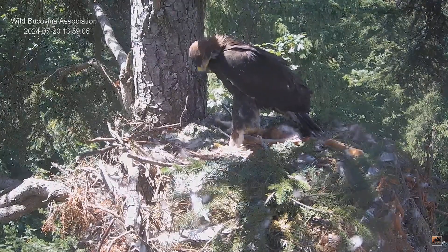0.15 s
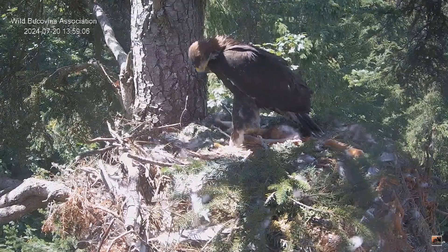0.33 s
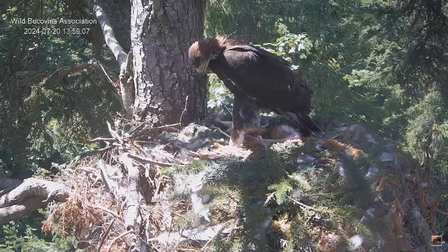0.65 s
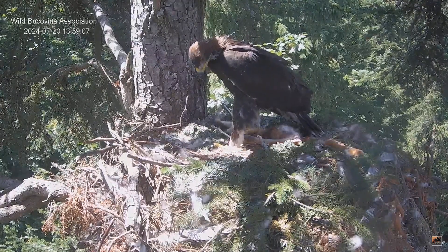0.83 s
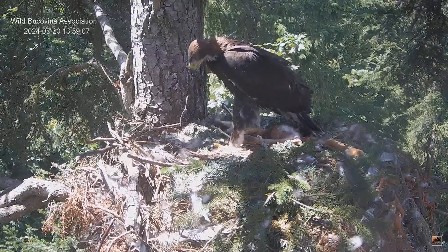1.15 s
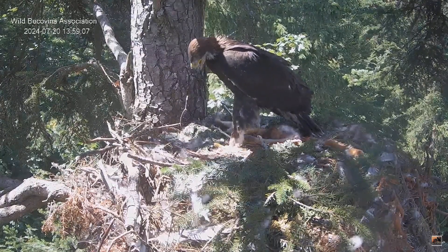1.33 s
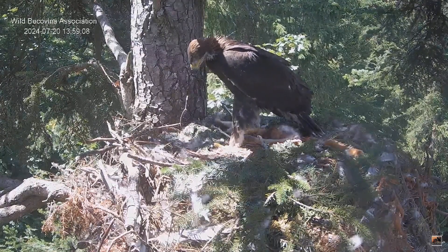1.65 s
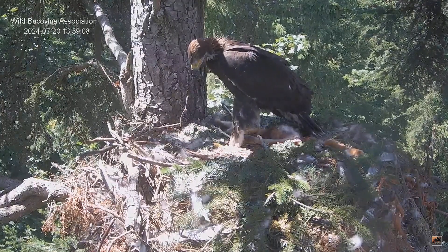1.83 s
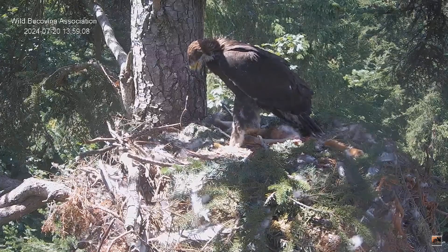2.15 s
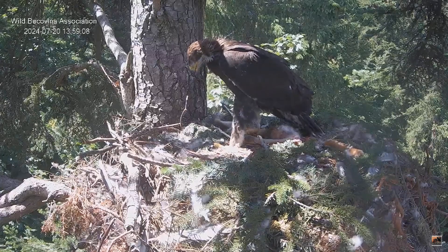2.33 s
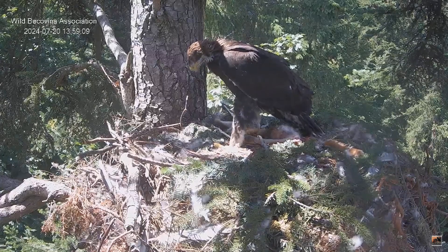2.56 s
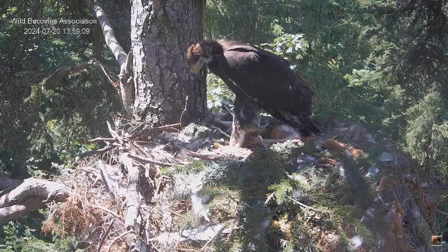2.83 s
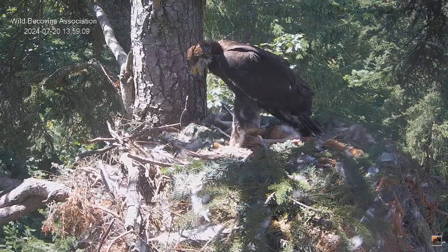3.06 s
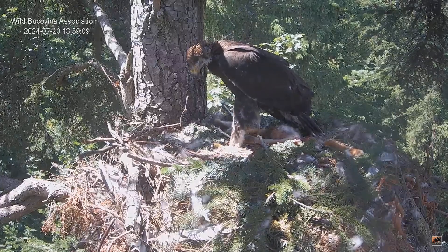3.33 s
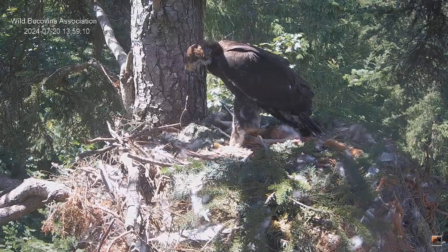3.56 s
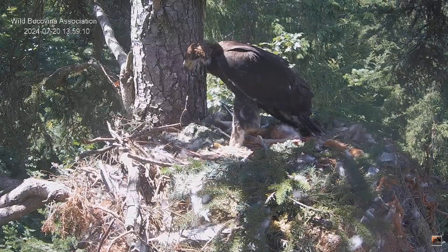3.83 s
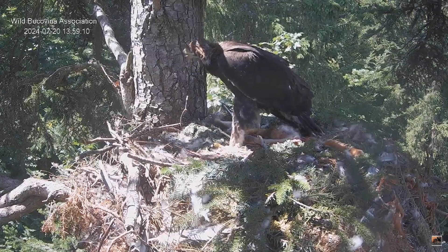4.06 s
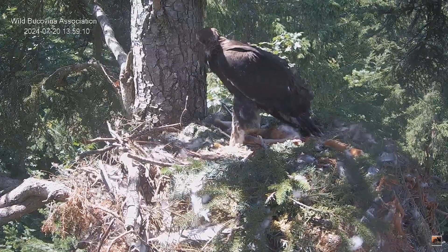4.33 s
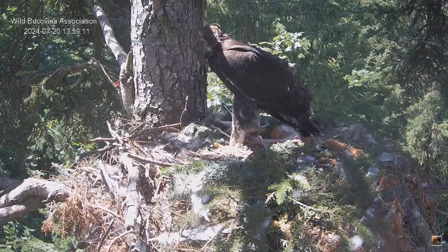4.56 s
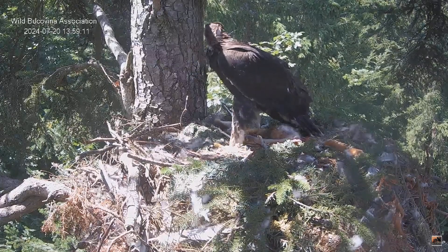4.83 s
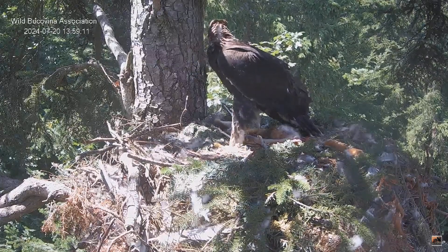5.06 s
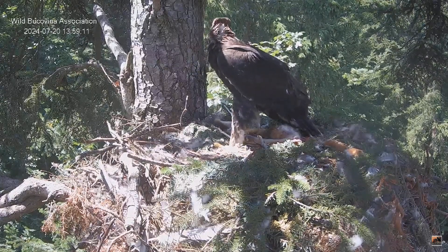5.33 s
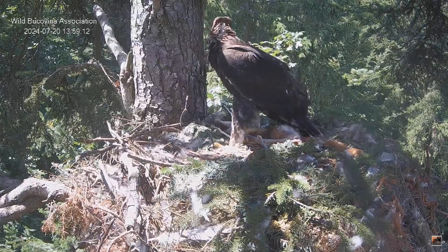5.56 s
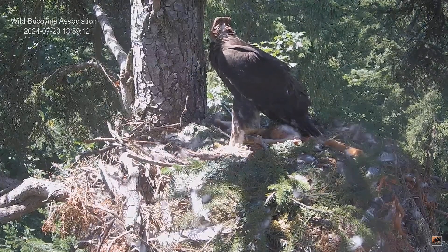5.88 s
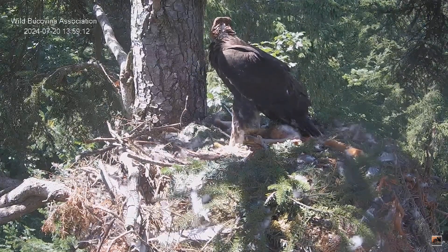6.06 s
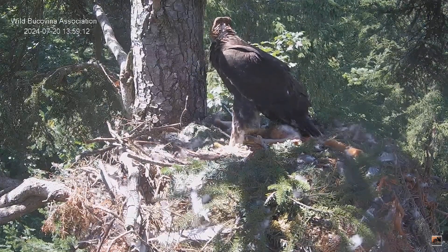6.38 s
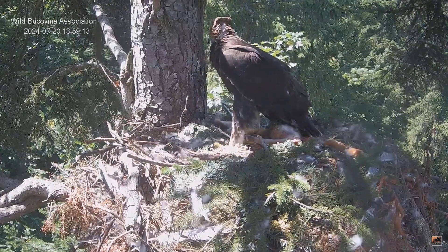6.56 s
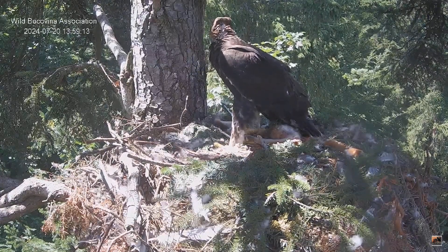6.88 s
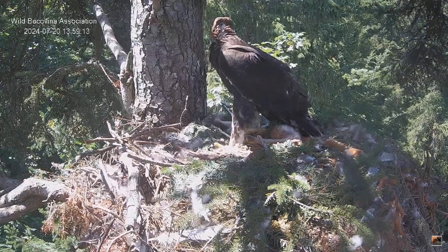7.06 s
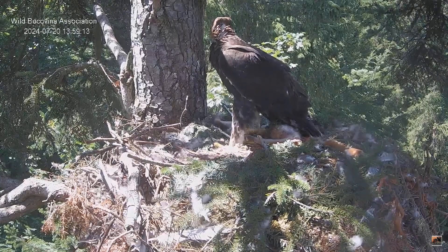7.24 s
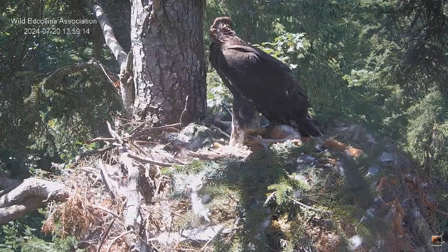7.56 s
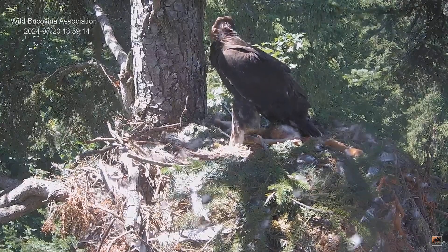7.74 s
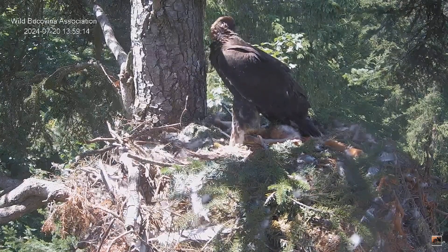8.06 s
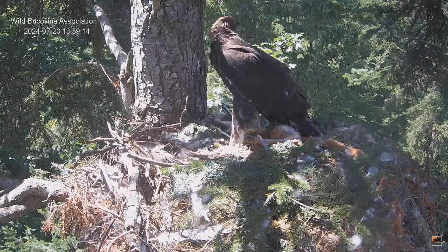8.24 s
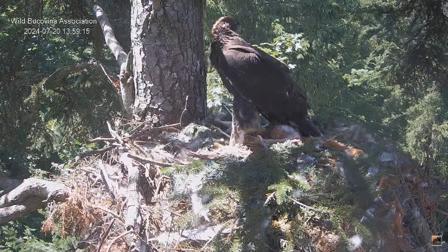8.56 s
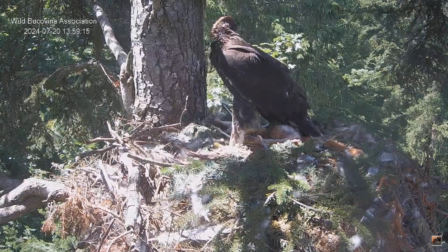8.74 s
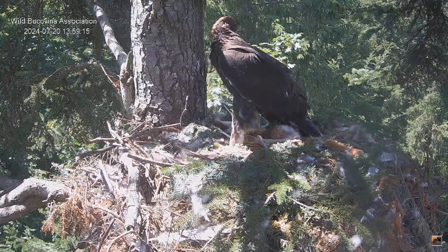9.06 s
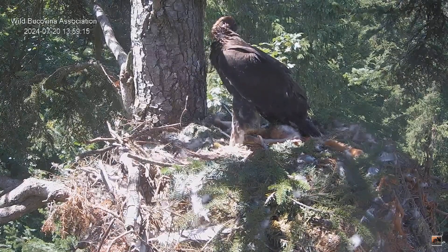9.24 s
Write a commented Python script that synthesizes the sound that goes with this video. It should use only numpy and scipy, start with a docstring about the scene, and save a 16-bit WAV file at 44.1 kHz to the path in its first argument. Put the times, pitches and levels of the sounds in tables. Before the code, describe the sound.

A young eagle begs close to the microphone in a conifer forest. The tail of a yelp is heard at the very start. Twelve calls follow, at about 0.4, 1.2, 2.1, 2.9, 3.8, 4.5, 5.2, 5.9, 6.7, 7.4, 8.1 and 8.8 seconds. Each opens with a tiny beak tick, shoots up into a piercing, very high whistle held for about a quarter second, then cracks into a short, softer yelp that falls in two steps. The yelps are raspy until about 3.5 seconds, then become cleaner and a little lower. A few later whistles grate slightly. From 4 seconds the echo among the trunks grows, staying fuller from about 6.5 seconds on. A very faint, steady forest hush lies underneath, and light puffs of wind rumble on the microphone, mostly in the second half, most noticeably near 8 and 9 seconds.

```python
"""A young eagle begging from its nest in a conifer forest, close to a fixed microphone.
The beak clicks open, the tightening syrinx sends up a piercing whistle that holds, and the voice
cracks into a yelp that falls in two register steps. Nest sticks within a metre or two smear the yelps.
Farther off, trunks echo the calls, more strongly once the bird lifts its head.
Light wind rumbles on the microphone over a faint forest hush."""
import sys
import numpy as np
from scipy import signal
from scipy.fft import rfft, irfft, next_fast_len
from scipy.io import wavfile
from scipy.ndimage import uniform_filter1d, minimum_filter1d, map_coordinates

SR = 44100
rng = np.random.default_rng(int(sys.argv[2]) if len(sys.argv) > 2 else 0)


def master(y):
    """Save y as 16-bit WAV."""
    cut = np.clip(np.atleast_2d(y).T, -1, 1)
    pcm = np.round(cut * 32767)  # scale
    wavfile.write(sys.argv[1], SR, pcm.astype(np.int16))


N = 414981
TIME = np.arange(N) / SR
TOP_HZ = 14700

# Whistles, levels relative: start_s, crack_s, held_hz, final_hz, rise_s, octave_db, hoarse_db,
# level_db, swell_db, snap_db, low_null_hz, low_depth_db, high_null_hz, high_depth_db
WHISTLE_CALLS = [(0.383, 0.604, 4548, 4800, 0.024, -27.5, -42.5, -8.5, 7.5, -14.5, 4623, 7.5, 4675, 12),
                 (1.249, 1.473, 4529, 4877, 0.029, -28.5, -41.5, -8, -2, -11, 4523, 8.5, 4700, 3.5),
                 (2.098, 2.316, 4628, 4810, 0.027, -28.5, -43, -8, 0.5, -7.5, 3980, 3, 4725, 10),
                 (2.891, 3.109, 4582, 4823, 0.023, -26, -35.5, -6.5, 2, -12, 4385, 13, 4580, 6.5),
                 (3.76, 3.983, 4680, 4861, 0.035, -28, -36.5, -5, -4.5, -11.5, 4370, 14.5, 4720, 4.5),
                 (4.519, 4.735, 4592, 4822, 0.021, -24.5, -42, -9, 13, -7.5, 4080, 17.5, 4734, 18),
                 (5.183, 5.408, 4647, 4858, 0.028, -28, -46.5, -9.5, 5, -9.5, 4593, 16.5, 4874, 7),
                 (5.887, 6.113, 4642, 4987, 0.024, -28.5, -47.5, -10, -0.5, -7, 4657, 23.5, 4961, 14),
                 (6.685, 6.905, 4490, 4998, 0.026, -28, -47.5, -7, 13.5, -16, 4684, 17.5, 4927, 18.5),
                 (7.373, 7.587, 4732, 4962, 0.025, -31.5, -41.5, -8.5, -1, -6.5, 4670, 11.5, 4872, 15),
                 (8.061, 8.288, 4663, 4935, 0.02, -35, -43.5, -6, 5, -10.5, 4753, 9.5, 4864, 11),
                 (8.795, 9.013, 4576, 5024, 0.017, -35, -49, -9, -8.5, -10.5, 4775, 24, 4840, 3.5)]
# Yelps, one ahead of the first whistle, then one after each; levels relative: upper_start_s,
# lower_start_s, end_s, upper_hz, lower_hz, slide_foot_db, upper_db, lower_db, tilt_db_per_octave
YELP_CALLS = [(-0.045, -0.013, 0.062, 2450, 1618, -13, -13, -16, 2.5),
              (0.639, 0.658, 0.745, 2431, 1675, -15.5, -12.5, -11, 1),
              (1.518, 1.527, 1.624, 2391, 1669, -8.5, -12.5, -11.5, 2.5),
              (2.365, 2.379, 2.468, 2442, 1689, -9, -13.5, -12, 1.5),
              (3.156, 3.168, 3.262, 2440, 1722, -10, -11, -12.5, 0),
              (4.028, 4.072, 4.143, 2292, 1517, -6, -11, -12, -1.5),
              (4.783, 4.827, 4.88, 2222, 1469, -13.5, -12, -13.5, -1.5),
              (5.461, 5.51, 5.56, 2110, 1412, -7.5, -11, -15.5, -13),
              (6.17, 6.204, 6.262, 2087, 1427, -7.5, -8.5, -14.5, -17),
              (6.965, 7.013, 7.064, 2100, 1378, -6, -8, -14.5, -17),
              (7.649, 7.683, 7.738, 2138, 1450, -3, -13.5, -11, -11),
              (8.335, 8.376, 8.435, 2152, 1431, -13, -10.5, -16.5, -12),
              (9.064, 9.109, 9.163, 2178, 1435, -16.5, -9.5, -15, -11.5)]
# Throat resonance that the whistle climbs into: pitch_hz, gain_db
THROAT_RESONANCE = [(2800, -32.5), (3500, -15), (3950, -14.5), (4350, -3.5), (4600, 1.5)]
# Side tones of a hoarse whistle: pitch_ratio, relative_db
HOARSE_TONES = [(0.748, -16), (.89, -19), (1.282, -11), (1.501, -8), (1.709, -12.5), (2.452, -26.5)]
# Moments when the whistle grates: start_s, end_s, level_db
GRATE_SPELLS = [(6.065, 6.112, -30), (7.47, 7.585, -28), (8.92, 9.01, -34)]
# Throat colour of the yelp's harmonics: frequency_hz, gain_db
THROAT_COLOUR = [(700, -32), (1150, -4), (1500, -7), (2200, -2), (2900, -0.5), (3600, -6.5), (4400, -5),
                 (5400, -7), (6500, -8), (8200, -11), (10000, -22.5), (14000, -38)]
# Vocal strain, harsh at first, later nearly clean: time_s, roughness (0-1)
VOICE_STRAIN = [(0, .32), (3.3, .42), (4, .13), (5.4, .08), (9.41, .09)]
# Air noise in the voice: frequency_hz, relative_db
BREATH_SPECTRUM = [(300, -57), (800, -27.5), (1800, -12.5), (3600, -5), (5500, 2), (7800, 2.5), (10000, -8),
                   (14500, -22)]
# Beak openings: start_s, relative_db
BEAK_OPENINGS = [(0.37, -34), (1.232, -35), (2.083, -32.5), (2.875, -37.5), (3.744, -41.5), (4.498, -53.5),
                 (5.172, -28.5), (5.869, -36.5), (6.673, -28), (7.359, -36.5), (8.044, -34), (8.775, -34)]
# Colour of a beak tick: frequency_hz, relative_db
TICK_SPECTRUM = [(200, -26), (600, -18.5), (950, -5.5), (1300, -8.5), (2100, -9), (3000, -24), (5000, -44),
                 (14000, -71)]
# Decay of the echoes among the trunks: frequency_hz, t60_s
TRUNK_DECAY = [(1000, 0.067), (2200, 0.8), (5000, 0.64), (7000, 1), (10000, 0.39)]
# Needles swallow the treble of the echoes: frequency_hz, gain_db
NEEDLE_FILTER = [(4800, 2.5), (8000, -1), (10000, -4.5)]
# Puffs of wind at the microphone: start_s, end_s, relative_db
WIND_GUSTS = [(0.167, 0.768, -69.5), (1.121, 1.425, -70.5), (2.394, 2.537, -51), (2.783, 3.26, -54),
              (3.956, 4.42, -46), (4.628, 4.724, -38.5), (5.19, 5.28, -51.5), (6.022, 6.313, -45.5),
              (6.784, 7.3, -44), (7.535, 7.653, -40), (7.828, 7.974, -30.5), (8.155, 8.284, -56.5),
              (8.932, 9.41, -36.5)]
# Wind rumble on the microphone: frequency_hz, relative_db
RUMBLE_SPECTRUM = [(20, 4.5), (45, 1.5), (100, -7), (170, -16), (250, -23), (400, -32), (700, -54),
                   (1500, -100)]
# Hush of the surrounding forest: frequency_hz, relative_db
HUSH_SPECTRUM = [(30, -6), (300, -0.5), (600, -4), (1500, -11), (5000, -15), (10000, -17.5), (15000, -21.5)]


def whistles(onset_hz=2800, gain_db=-1.25, snap_drop=.07, third_db=-12):
    """The syrinx tightens: a nearly pure tone shoots up, wavers higher and ends in a snap."""
    out, air = np.zeros(N), noise(BREATH_SPECTRUM)
    for call, (*_, tilt_db) in zip(WHISTLE_CALLS, YELP_CALLS[1:]):
        start, end, held_hz, final_hz, rise_s = call[:5]
        octave_db, hoarse_db, level_db, swell_db, snap_db, *nulls = call[5:]
        span = during(start, end + .008)
        t = TIME[span]
        age = np.abs(t - start)
        progress = age / (end - start)
        slack = np.exp(-(age / rise_s) ** 1.3)  # 1 at the onset, 0 once taut
        hz = held_hz + (final_hz - held_hz) * progress - (held_hz - onset_hz) * slack
        held_db = level_db + swell_db * (progress - .5) + along(THROAT_RESONANCE, hz)
        held_db += (1 + 4 * slack) * ripple(hz, 110) - trunk_dips(hz, nulls)
        snap = ramp((t - end + .001) / .002)
        hz = hz * (1 - snap_drop * ramp((t - end + .0014) / .011))
        waver = .0016 * wobble(1200, t) + (.0012 + .01 * slack) * wobble(110, t) + .0026 * wobble(24, t)
        phase = cycle(hz * (1 + waver))
        flutter_db = 2 * wobble(60, t) + (.4 + 2 * slack) * wobble(360, t)
        level = amp(gain_db + held_db + snap * (snap_db - held_db) + flutter_db)
        overtones = overtone(2, t, hz, phase) + amp(third_db + .6 * tilt_db) * overtone(3, t, hz, phase)
        tone = level * np.sin(phase) + amp(octave_db + 1 - 20 * slack) * overtones + grating(t, hz)
        hoarse = hoarseness(t, hz, tilt_db, air[span])
        hoarse *= amp(hoarse_db + 2 + 2 * wobble(35, t)) * (1 - slack) ** 12
        gate = ramp(age / .015) * ramp((end + .0065 - t) / .001)
        out[span] = gate * (np.sqrt(2) * tone + hoarse)
    return out


def overtone(k, t, hz, phase, notch_db=9, spacing_hz=130):
    """Harmonic k of the whistle flickers and drops out as it glides through narrow notches."""
    db = notch_db * np.minimum(ripple(k * hz, spacing_hz), 0) + 2.2 * wobble(160, t)
    return amp(db) * np.sin(k * phase)


def hoarseness(t, hz, tilt_db, air, hiss_db=-12):
    """Breath hiss and unsteady side tones around the whistle."""
    out = amp(hiss_db) * air
    for ratio, db in HOARSE_TONES:
        head_db = .5 * tilt_db * np.log2(ratio / 1.5)  # a turned head favours the low side tones
        phase = cycle(hz * (ratio + .03 * wobble(28, t)))
        side_tone = wobble(300, t) * np.sin(phase) + wobble(300, t) * np.cos(phase)
        out += amp(db + head_db + 4.5 * wobble(40, t)) * side_tone
    return out


def grating(t, hz, pitch_ratio=.87):
    """A shaky second vibration under the whistle, only where the voice grates."""
    level = sum(amp(db) * ramp((t - start) / .01) * ramp((end - t) / .01)
                for start, end, db in GRATE_SPELLS)
    return level * (1 + .6 * wobble(300, t)) * np.sin(cycle(hz * (pitch_ratio + .055 * wobble(350, t))))


def yelps(crack_hz=4500, catch_hz=2480, crack_db=-22, choke_db=-22, stutter_db=4,
          upper_fall=.07, lower_fall=.23, sag_db=-4, fade_db=-21, dull_db=-9):
    """The whistle breaks into a thin slide; the voice catches, drops about a fifth and dies away."""
    out, air = np.zeros(N), noise(BREATH_SPECTRUM)
    cracks = [YELP_CALLS[0][0] - .04] + [call[1] for call in WHISTLE_CALLS]
    for crack, call in zip(cracks, YELP_CALLS):
        start, step, end, upper_hz, lower_hz, foot_db, upper_db, lower_db, tilt_db = call
        span = during(crack, end + .006)
        t = TIME[span]
        rough = np.interp(start, *np.transpose(VOICE_STRAIN))
        stages = [(crack, start), (start, step), (step, end)]
        slide, early, late = (np.clip((t - a) / (b - a), 0, 1) for a, b in stages)
        caught = ramp((slide - .66) / .35)
        settled = ramp((t - start + .00051) / .0014)
        drop = ramp((t - step + .004) / .007)
        # the sliding voice stutters; under strain it almost chokes off
        unsteady = .05 * (1 - caught) * wobble(260, t)
        slide_hz = (crack_hz + (catch_hz - crack_hz) * slide ** 1.2) * (1 + unsteady)
        broken_db = crack_db + choke_db * rough + stutter_db * wobble(260, t)
        slide_db = caught * foot_db + (1 - caught) * broken_db
        # it settles in the upper register
        hz = slide_hz + settled * (upper_hz * (1 - upper_fall * (early - .5)) - slide_hz)
        db = slide_db + settled * (upper_db + sag_db * (early - .5) - slide_db)
        upper_rough = .24 * (1 - caught) + .75 * caught * rough
        upper = amp(db) * voice(t, hz, tilt_db - 6 * (1 - settled), 0, upper_rough, air[span])
        # the lower register sinks and loses its overtones as the pressure goes
        hz = lower_hz * (1 - lower_fall * late ** 1.25)
        db = lower_db + fade_db * late ** 1.9
        lower = amp(db) * voice(t, hz, tilt_db, dull_db * late ** 4, rough, air[span])
        gate = ramp((t - crack) / .008) * ramp((end + .005 - t) / .012)
        out[span] = gate * ((1 - drop) * upper + drop * lower)
    return out


def voice(t, hz, tilt_db, dull_db, rough, air, rasp_db=-14, harmonics=12):
    """Harmonics through the throat; roughness shakes the cycles, doubles the period and leaks air."""
    phase = cycle(hz * (1 + .014 * rough * wobble(900, t) + .005 * wobble(170, t)))
    k = np.arange(2, 2 * harmonics + 1)[:, None] / 2
    treble_octaves = np.log2(np.clip(k * hz / 3200, 1, 2.8))
    colour_db = along(THROAT_COLOUR, k * hz) + tilt_db * treble_octaves + dull_db * np.log2(k)
    bounce_db = (2 + 3 * treble_octaves) * ripple(k * hz, 230)
    flicker_db = (2 + 1.1 * treble_octaves) * np.array([wobble(160, t) for _ in k])
    gains = amp(colour_db + bounce_db + flicker_db) * (k * hz < TOP_HZ)
    # tones halfway between the harmonics come and go
    gains[1::2] *= 1.4 * rough ** 2 * (1 + .9 * np.array([wobble(200, t) for _ in k[1::2]]))
    tone = np.sqrt(2) * np.sum(gains * np.sin(k * phase), 0) / np.linalg.norm(gains, axis=0)
    growl = .07 * rough ** 2 * (1 + .5 * wobble(200, t)) * np.sin(phase / 2)
    rasp = amp(rasp_db + tilt_db / 2) * rough * air * (1 + np.cos(phase))
    return (tone + growl) * (1 + .35 * rough * wobble(900, t)) + rasp


def beak(gain_db=-7, gap_s=.0017, t60_s=.033, ticks=3):
    """The wet beak parts with a few tiny ticks in quick succession."""
    envelope = np.zeros(N)
    for start, db in BEAK_OPENINGS:
        span = during(start, start + .05)
        for k, shift in enumerate(rng.uniform(-.018, .15, ticks)):
            age = TIME[span] - start - gap_s * k * (1 + shift)
            envelope[span] += ramp(age / .00029) * amp(db + gain_db - 3.4 * k - 60 * np.abs(age) / t60_s)
    return envelope * noise(TICK_SPECTRUM)


def ripple(hz, spacing_hz):
    """Bounces near the beak lift some frequencies and thin others: a random curve over frequency."""
    return map_coordinates(rng.standard_normal(512), [hz / spacing_hz], mode="mirror")


def trunk_dips(hz, nulls, width_hz=68.5):
    """Loss in dB where bounces off the trunk cancel two narrow bands, which shift with the head."""
    return sum(depth_db * np.exp(-((hz - null_hz) / width_hz) ** 2)
               for null_hz, depth_db in zip(nulls[::2], nulls[1::2]))


def nest(x, scatter_db=-12, t60_s=.03, samples=2048):
    """Sticks and bark within a metre or two smear the gliding notes."""
    t = TIME[:samples]
    twigs = unit(rng.standard_normal(samples) * amp(-60 * t / t60_s) * ramp(t / .008)) / np.sqrt(samples)
    return x + amp(scatter_db) * signal.fftconvolve(x, twigs)[:N]


def forest_echo(x, near_db=-29, far_db=-32, near_t60_s=.17, build_s=.029, reach_s=.24, beyond_db=-12):
    """Nearby twigs answer at once; a ring of trunks scatters echoes back, with little from beyond."""
    t = TIME[:SR]
    near = unit(rng.standard_normal(SR) * amp(-60 * t / near_t60_s)) / np.sqrt(SR)
    trunks = np.bincount(rng.integers(0, SR, 240), rng.standard_normal(240), SR)
    hz, delay_s, bands = signal.stft(unit(trunks) + rng.standard_normal(SR), SR, nperseg=256)
    bands *= amp(-60 * delay_s / along(TRUNK_DECAY, hz)[:, None])
    far = signal.istft(bands, SR, nperseg=256)[1][:SR]
    beyond = ramp((t - reach_s) / .058 + .5)
    far = unit(far * ramp(t / build_s) * amp(beyond_db * beyond)) / np.sqrt(SR)
    echo = signal.fftconvolve(x, amp(near_db) * near + amp(far_db) * far)[:N]
    return filtered(echo, lambda hz: amp(along(NEEDLE_FILTER, hz)))


def wind(gain_db=1, draught_db=-80.5, lumps_db=4, rise_db_per_s=378, fall_db_per_s=172):
    """Lumpy gusts buffet the microphone; each rises fast, holds and ebbs."""
    envelope = amp(draught_db)
    for start, end, db in WIND_GUSTS:
        before_s, after_s = np.maximum(start - TIME, 0), np.maximum(TIME - end, 0)
        envelope = envelope + amp(db + gain_db - rise_db_per_s * before_s - fall_db_per_s * after_s)
    return envelope * unit(amp(lumps_db * wobble(22, TIME)) * noise(RUMBLE_SPECTRUM))


def forest_hush(level_db=-75):
    """The faint, steady hush of the forest behind the bird."""
    return amp(level_db) * noise(HUSH_SPECTRUM)


def amp(db):
    """Decibels to gain."""
    return 10 ** (np.asarray(db) / 20)


def unit(x):
    """Scale to rms 1."""
    return x / np.sqrt(np.mean(x ** 2) + 1e-20)


def along(points, hz):
    """Read (frequency_hz, value) points on a log axis."""
    frequencies, values = np.transpose(points)
    return np.interp(np.log(hz + 1), np.log(frequencies + 1), values)


def ramp(u):
    """A smooth step as u goes from 0 to 1."""
    return np.sin(np.pi / 2 * np.clip(u, 0, 1)) ** 2


def wobble(rate, t):
    """A smooth random curve at the times t, rate knots a second."""
    return map_coordinates(rng.standard_normal(512), [(t - t[0]) * rate], mode="mirror")


def filtered(x, response):
    """Shape x by a frequency response."""
    size = next_fast_len(N + SR // 2)
    return irfft(rfft(x, size) * response(np.fft.rfftfreq(size, 1 / SR)), size)[:N]


def noise(spectrum):
    """Noise of rms 1 with the given colour."""
    return unit(filtered(rng.standard_normal(N), lambda hz: amp(along(spectrum, hz))))


def during(start, end):
    """The samples between two times."""
    return slice(max(int(start * SR), 0), int(end * SR))


def cycle(hz):
    """Phase of a vibration that follows a pitch curve."""
    return 2 * np.pi * np.cumsum(hz) / SR


def scene(whistle_echo_db=-3, whistle_lift_db=14.5, yelp_echo_db=-5, yelp_lift_db=3):
    """The eagle close up, in mono; once it lifts its head, the call carries farther into the trees."""
    whistle = whistles()
    yelp_and_beak = amp(-1) * nest(yelps()) + beak()
    lifted = ramp((TIME - 4) / 2.5)
    echo = forest_echo(amp(whistle_echo_db + whistle_lift_db * lifted) * whistle
                       + amp(yelp_echo_db + yelp_lift_db * lifted) * yelp_and_beak)
    return (whistle + yelp_and_beak + echo + wind() + forest_hush())[None]


def record(dry, ceiling=.76, window_samples=130, rolloff_hz=14300):
    """After the microphone, a fast limiter holds the loudest calls and the top treble rolls off."""
    needed = ceiling / np.maximum(np.abs(dry[0]), ceiling)
    gain = uniform_filter1d(minimum_filter1d(needed, window_samples), window_samples)
    return filtered(dry[0] * gain, lambda hz: (hz < TOP_HZ) / (1 + (hz / rolloff_hz) ** 20))[None]


dry = scene()
out = record(dry)
master(out)
```